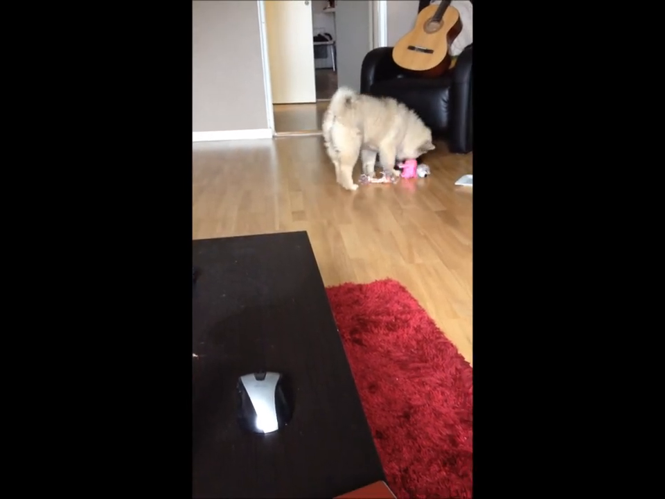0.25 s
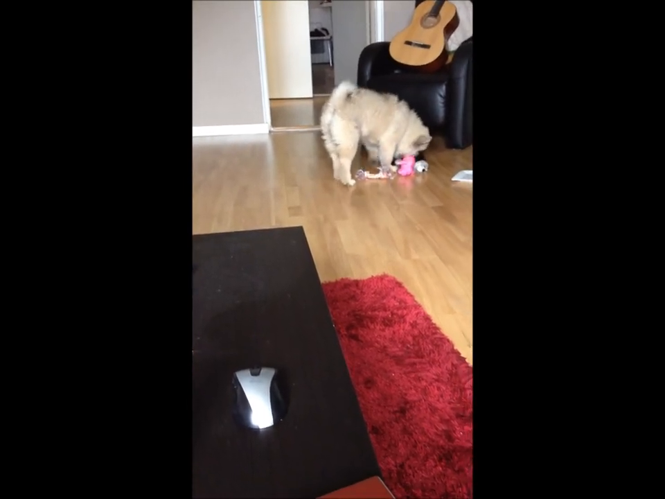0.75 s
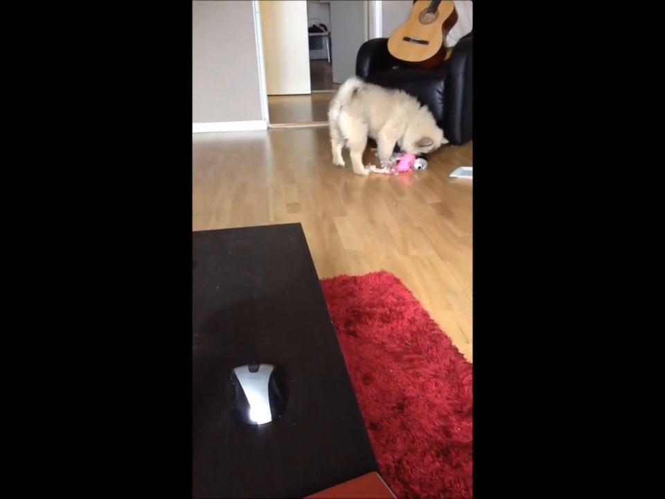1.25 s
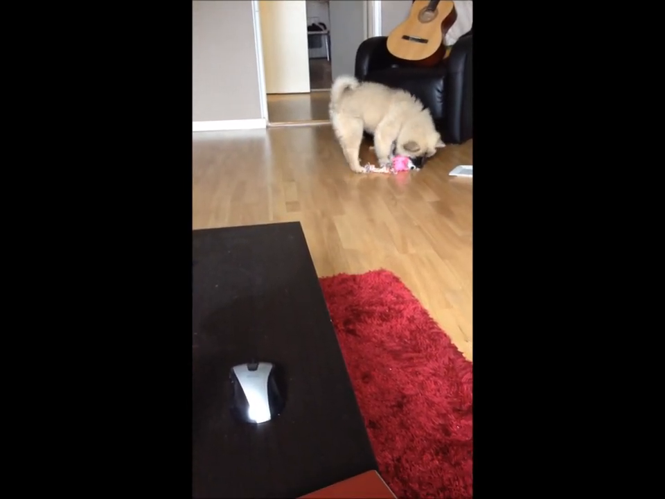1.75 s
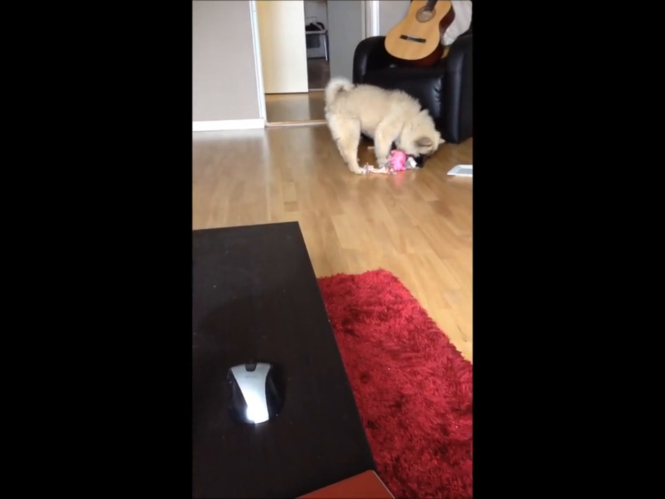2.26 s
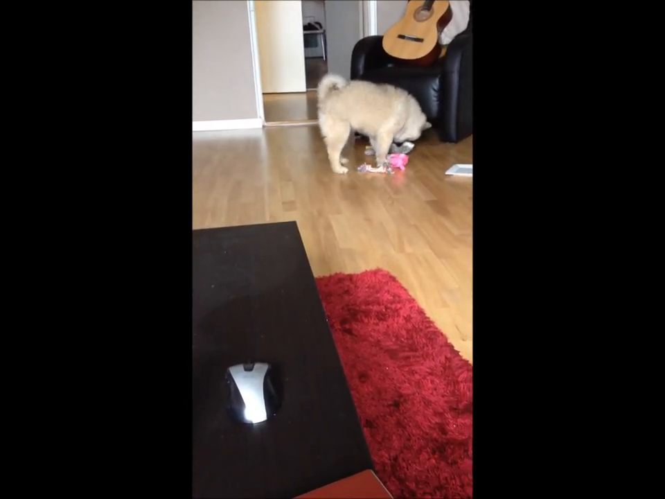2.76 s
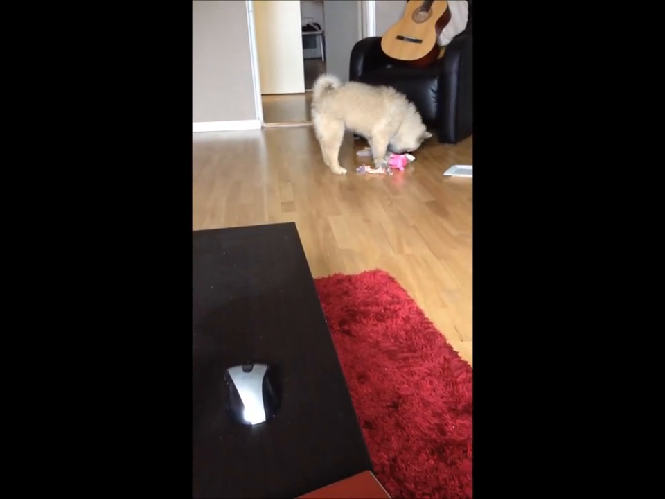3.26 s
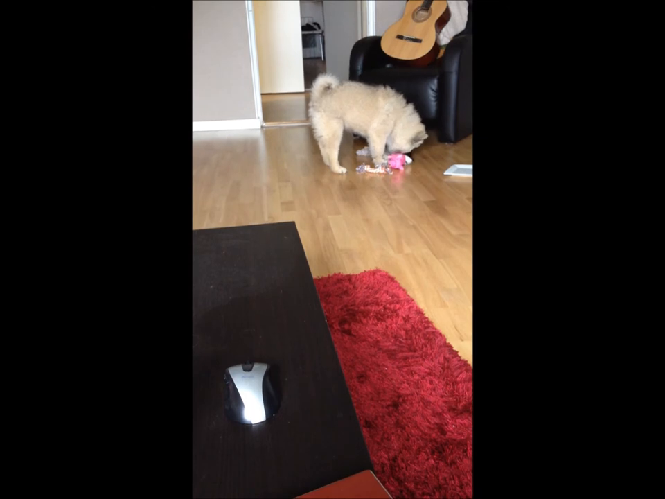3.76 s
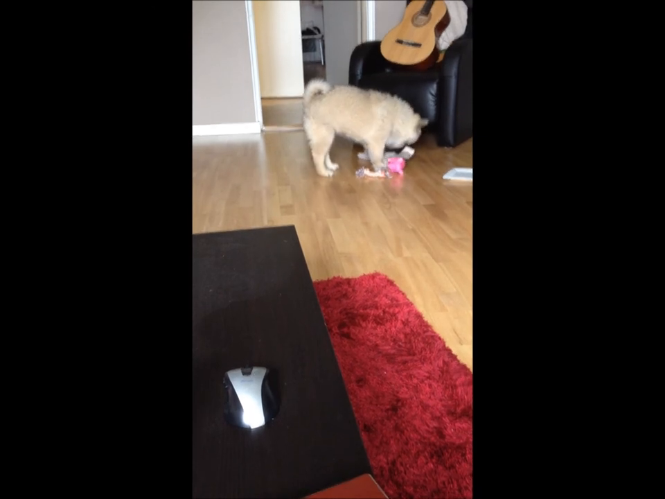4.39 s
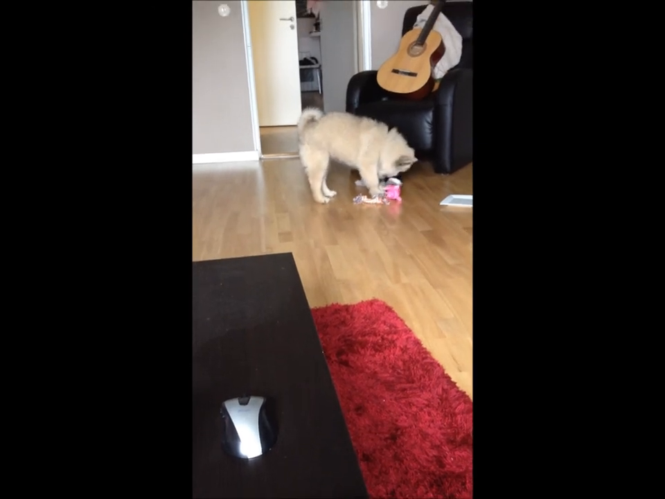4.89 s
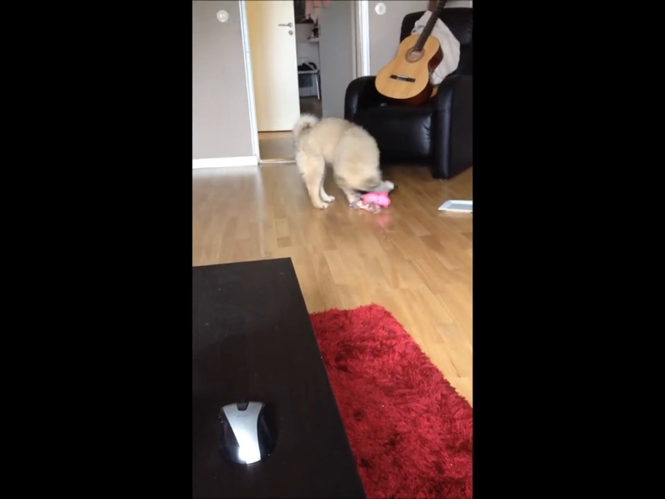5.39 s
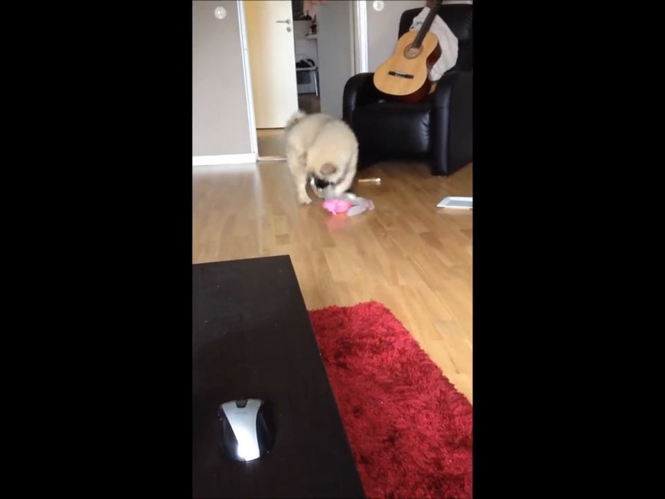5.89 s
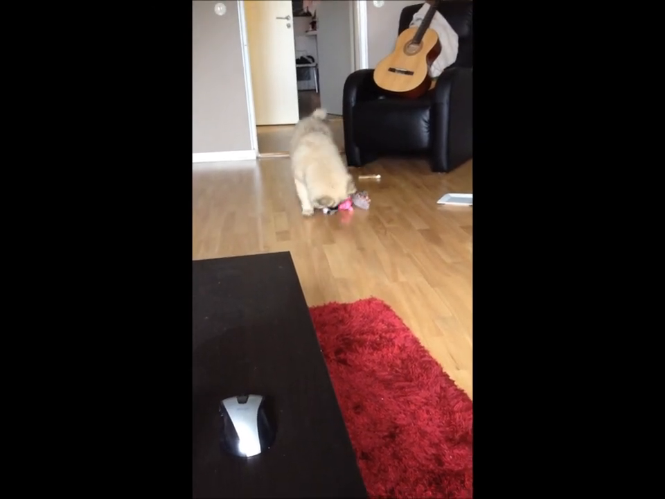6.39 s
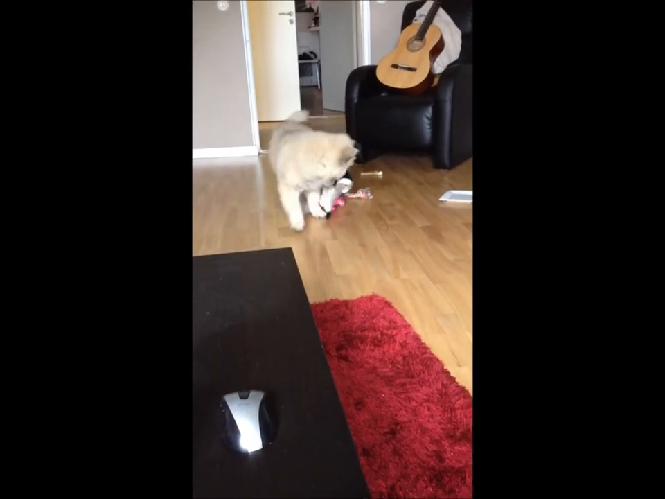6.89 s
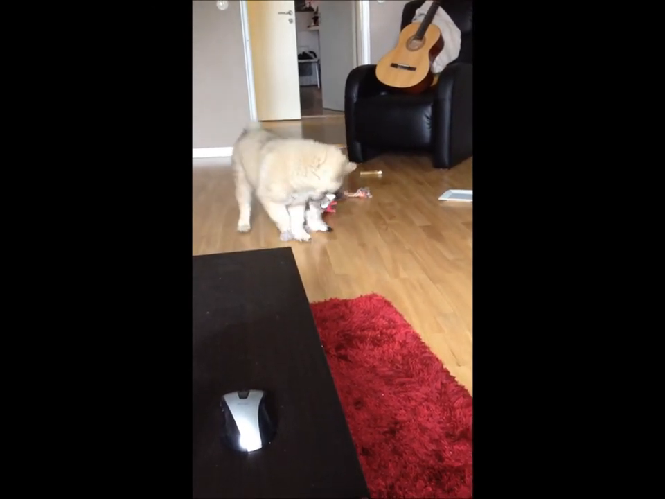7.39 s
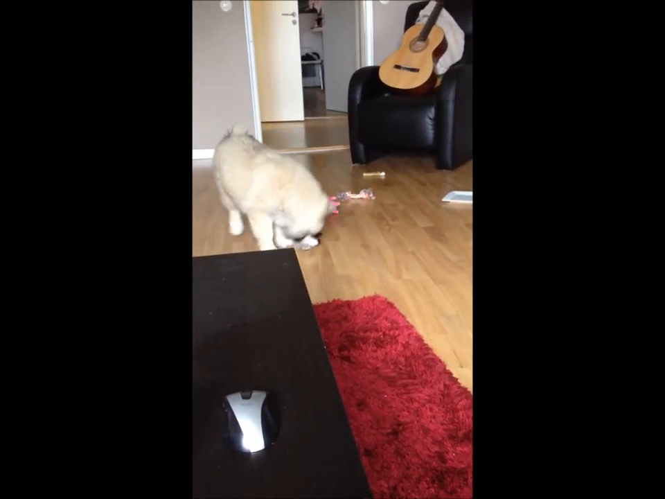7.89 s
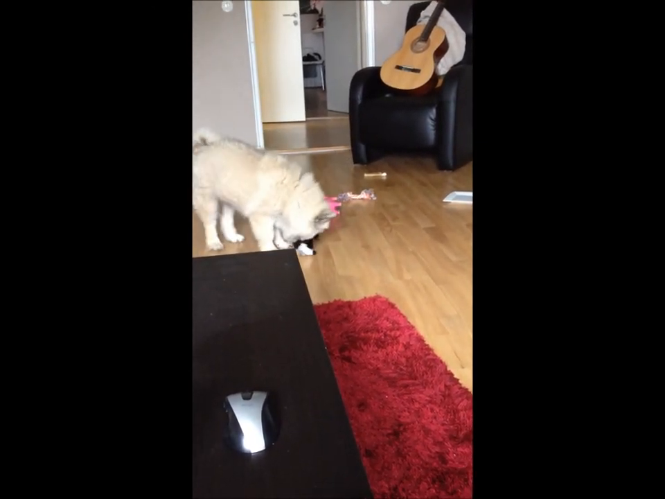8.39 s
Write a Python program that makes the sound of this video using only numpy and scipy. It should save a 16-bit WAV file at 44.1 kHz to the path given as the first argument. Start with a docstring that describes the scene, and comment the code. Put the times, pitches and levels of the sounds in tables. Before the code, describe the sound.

A small dog chews a squeaky toy indoors, short raspy squeaks in uneven bursts, with soft floor bumps and a sharp click in a ringing room.

```python
"""A small dog chews a plush squeaky toy on the wooden floor of a bare, ringing living room.
Over a faint hush, paws shuffle and plush rustles (shaped noise), then soft bumps thud in the boards.
From about two seconds the toy squeaks: each bite forces air out through a reed, a harmonic tone that
bends and rasps, and the bulb refills on a steadier, gentler note.
Later come more bumps, two brief drags and two claw or tooth clicks (decaying modes); squeaks end it."""
import sys
import numpy as np
from scipy import signal
from scipy.fft import rfft, irfft, next_fast_len
from scipy.io import wavfile
from scipy.ndimage import map_coordinates

SR = 44100
rng = np.random.default_rng(int(sys.argv[2]) if len(sys.argv) > 2 else 0)


def store_pcm(level_fs):
    """Save levels as 16-bit WAV."""
    pcm = np.round(np.clip(level_fs, -1, 1) * 32767).astype(np.int16)
    wavfile.write(sys.argv[1], SR, np.atleast_2d(pcm).T)


N = 381465

# Levels in the event tables are relative: each layer adds its own offset or room sound.
# Bites, air going out: the jaws squeeze, then clamp down and the reed moves to another, mostly higher note.
# Each row: start in seconds, length in s, clamp after s, clamping time in s, start pitch in Hz,
# squeeze pitch in Hz, clamp pitch in Hz, squeeze level in dB, clamp level in dB, clamped rasp from 0 to 1.
BITES = [ (2.651, 0.049, 0.011, 0.010, 1093, 1152, 1196, -38, -37.5, 0.3),
         (3.136, 0.04, 0.014, 0.002, 1429, 1531, 1813, -26, -27.5, 0.95),
         (3.427, 0.032, 0.0044, 0.0055, 1188, 1220, 1250, -39, -40.5, 0.7),
         (3.591, 0.07, 0.038, 0.0013, 1145, 1510, 1864, -30.5, -26.5, 0.91),
         (3.916, 0.081, 0.031, 0.0018, 1275, 1830, 1989, -23.5, -23, 0.65),
         (4.281, 0.071, 0.042, 0.0054, 1338, 1760, 2036, -27, -22, 0.74),
         (4.723, 0.037, 0.0063, 0.010, 1090, 1147, 1103, -41, -46, 0.53),
         (5.147, 0.043, 0.014, 0.0083, 1345, 1356, 1319, -32, -36.5, 0.57),
         (5.773, 0.070, 0.022, 0.0106, 1412, 1401, 1571, -38, -34, 1),
         (7.554, 0.036, 0.0062, 0.004, 1349, 1520, 1546, -31.5, -31.5, 0.53),
         (7.896, 0.13, 0.045, 0.024, 1255, 1198, 1498, -36.5, -31.5, 0.34),
         (8.255, 0.13, 0.073, 0.027, 1308, 1247, 1639, -33.5, -29.5, 0.16)]
# Refills, air drawn back in: the flow swells to a crest and ebbs.
# Each row: start in seconds, length in s, crest as a share of the length, pitch at weak flow in Hz,
# pitch at the crest in Hz, level in dB, rasp at the crest from 0 to 1.
REFILLS = [ (1.883, 0.040, 0.025, 1118, 1190, -43.5, 0.62), (2.79, 0.11, 0.44, 1166, 1196, -37.5, 0.12),
           (3.248, 0.046, 0.082, 993, 1043, -49, 0.1), (3.317, 0.108, 0.30, 1148, 1190, -35, 0.16),
           (3.747, 0.096, 0.524, 1112, 1172, -39.5, 0.37), (4.081, 0.15, 0.187, 1135, 1183, -37, 0.25),
           (4.406, 0.12, 0.70, 1144, 1167, -36, 0.38), (4.8, 0.072, 0.333, 1109, 1179, -38.5, 0.2),
           (5.425, 0.026, 0.02, 1070, 1175, -44, 0.83), (6.565, 0.025, 0.016, 970, 1183, -45.5, 0.7),
           (7.053, 0.016, 0.02, 1000, 1060, -49.5, 0.2), (7.624, 0.12, 0.46, 1069, 1175, -39.5, 0.3),
           (8.049, 0.1, 0.53, 1122, 1257, -35, 0.1), (8.447, 0.13, 0.54, 1113, 1264, -36.5, 0.13)]
# The toy's resonant colour for air going out and coming in. Each row: frequency in Hz, relative gain in dB.
OUT_COLOUR = [(1000, 8), (1500, 1), (1900, 4.5), (2400, 0), (3000, -3), (4500, -3), (5600, -3), (7200, 4),
              (8400, -3), (9500, -16.5), (10800, -30.5), (14000, -33)]
IN_COLOUR = [(1000, 1.5), (1200, 6), (2350, -1.5), (3500, -6.5), (4700, -8.5), (5800, -18), (7000, 2),
             (8200, 2.5), (9400, -9.5), (10600, -36), (12000, -26.5), (14200, -21.5), (15200, -51)]
# Air hissing through the reed, out and in. Each row: frequency in Hz, relative density in dB per Hz.
OUT_HISS = [(70, -51), (170, -14.5), (400, -6.5), (1000, -3), (1800, -3.5), (2500, -4), (4000, -0.5),
            (7300, 3.5), (9000, -13.5), (10800, -27), (14500, -27)]
IN_HISS = [(100, -35.5), (500, -3), (1100, -31), (1700, -4.5), (2300, -4), (5200, -7), (6800, -7),
           (7900, 17.5), (9000, -34), (10200, -30), (14500, -22.5)]
# Paws and toy bumping the floor.
# Each row: start in seconds, level in dB, upper band edge in Hz, time to decay by 30 dB in s.
BUMPS = [(0.866, -59, 330, 0.051), (1.047, -57.5, 367, 0.039), (1.112, -59, 380, 0.024),
         (4.628, -49, 1090, 0.057), (5.199, -36, 1080, 0.08), (5.713, -45.5, 517, 0.13),
         (5.754, -57, 520, .06), (5.811, -41.5, 1090, 0.14), (5.896, -44.5, 710, 0.13),
         (6.05, -51.5, 582, 0.22), (6.261, -40.5, 437, 0.082), (6.291, -47.5, 694, 0.036),
         (6.335, -53, 497, 0.088), (6.56, -46, 915, 0.34), (7.067, -43.5, 444, 0.055),
         (7.132, -49, 610, 0.091)]
# The floor's response to a bump. Each row: frequency in Hz, relative density in dB per Hz.
FLOOR_SPECTRUM = [(50, -36), (100, -13), (150, -9), (230, 11), (330, 3), (450, 2.5), (700, 5.5), (1500, 5),
                  (4000, 16.5), (15000, 29.5)]
# Claws and teeth clicking. Each row: start in seconds, level in dB.
CLICKS = [(6.449, -38.5), (6.8591, -22.5)]
# The modes of a hard tap on the plastic toy. Each row: frequency in Hz, relative level in dB, 60 dB decay in s.
TAP_MODES = [(850, 0.5, 0.0084), (1530, 3, 0.0047), (2050, 20, 0.0027), (5630, -16, 0.0017)]
# Plush and fur brushing, the toy dragging, paws shuffling. Each row: start in seconds, length in s, level in dB.
RUSTLES = [(0, 0.011, -60), (.727, 0.026, -58.5), (.855, 0.033, -62), (1.01, 0.065, -68.5),
           (1.43, 0.045, -69), (2.415, 0.087, -59.5), (2.59, 0.042, -75), (5.57, 0.075, -61),
           (6.16, 0.063, -59.5), (6.445, 0.034, -54.5), (6.765, 0.03, -56.5), (6.864, 0.04, -48),
           (7.115, 0.045, -46.5), (7.155, 0.071, -47), (7.41, 0.08, -65.5)]
DRAGS = [(4.625, 0.05, -45), (5.885, 0.052, -43)]
SHUFFLES = [(0, 0.3, -71), (.2, 0.36, -68)]
# Spectra of these frictions and of the room's hush. Each row: frequency in Hz, relative density in dB per Hz.
PLUSH_SPECTRUM = [(70, -39), (300, 2.5), (1300, -11.5), (2100, 4), (3000, 1.5), (4500, 2), (7500, 0.5),
                  (10500, -11.5), (15000, -10)]
DRAG_SPECTRUM = [(70, -30), (300, -20), (900, -23), (1450, -10.5), (1850, 7), (2300, -16), (5000, -22),
                 (9000, -23), (15000, -46)]
SHUFFLE_SPECTRUM = [(59, -46), (100, -40), (194, 4.5), (293, -4.5), (491, -1), (1120, -11.5), (1850, -8),
                    (9260, -23), (14000, -85)]
HUSH_SPECTRUM = [(15, -47), (25, -30), (75, -31.5), (125, -8), (163, -10), (202, 0.5), (318, -12),
                 (394, -7.5), (450, -13.5), (529, -10.5), (604, -16.5), (709, -16), (2240, -22),
                 (8320, -27), (15000, -31)]
# The room's reverberation. Each row: frequency in Hz, 60 dB decay time in s.
ROOM_DECAY = [(250, 0.46), (1200, 0.46), (3000, 0.5), (7000, 0.42), (14000, 0.31)]

HUSH_DB = -70
TOP_HZ = 15400  # upper band limit
SQUEEZE_RASP = 0.19  # 0 to 1, before the jaws clamp
SQUEEZE_S, SQUEEZE_DB = 0.0093, 9  # width in s of the Gaussian onset, and the level it gains in dB
# As the bulb empties: slack reed's pitch in Hz, share of the way the note moves to it, fade in dB
SLACK_HZ, EMPTY_SAG, EMPTY_DB = 994.5, 0.62, 6.5
JAW_RATE, JAW_BEND, JAW_DB = 111.3, 0.01214, 1  # unsteady grip: knots per second, share of pitch, dB
UNFOLD_RATE, UNFOLD_BEND, UNFOLD_DB = 55.6, 0.00906, 2  # uneven unfolding: the same three units
EBB_RASP = 0.23  # rasp added at weak flow


def squeaker():
    """A driven reed sounds in both directions of flow: forced hard by bites, gently by refills."""
    track = np.zeros(N)
    for start, *row in BITES:
        pitch, db, rasp = bite(*row)
        squeak = reed(pitch, db, rasp, OUT_COLOUR, OUT_HISS,
                      bright=0.0061, hiss_db=-4.5, jitter=0.035, waver=0.0366)
        add(track, start, amp(0.7) * in_room(squeak, wet_db=2.0))
    for start, *row in REFILLS:
        pitch, db, rasp = refill(*row)
        squeak = reed(pitch, db, rasp, IN_COLOUR, IN_HISS,
                      bright=0.11, hiss_db=-1.5, jitter=0.016, waver=0.023)
        add(track, start, amp(0.98) * in_room(squeak, wet_db=0.5))
    return track


def bite(length, clamp_s, clamping_s, start_hz, squeeze_hz, clamp_hz, squeeze_db, clamp_db, rasp):
    """Pressure governs pitch, level and rasp: they settle, shift as the jaws clamp, and pitch and level sag at last."""
    t = np.arange(0, length, 1 / SR)
    slack = np.exp(-(t / SQUEEZE_S) ** 2)
    clamp = 0.5 + 0.5 * np.tanh(2 * (t - clamp_s) / clamping_s)
    spent = np.clip((t - clamp_s) / max(length - clamp_s, 1 / SR), 0, 1) ** 2

    squeezed_hz = squeeze_hz + (start_hz - squeeze_hz) * slack
    squeezed_db = squeeze_db - SQUEEZE_DB * slack
    clamped_hz = clamp_hz + (SLACK_HZ - clamp_hz) * EMPTY_SAG * spent
    clamped_db = clamp_db - EMPTY_DB * spent

    pitch = squeezed_hz + (clamped_hz - squeezed_hz) * clamp
    db = squeezed_db + (clamped_db - squeezed_db) * clamp
    rough = SQUEEZE_RASP + (rasp - SQUEEZE_RASP) * clamp
    grip = wobble(JAW_RATE, len(t))
    return pitch * (1 + JAW_BEND * grip), db + JAW_DB * grip, rough


def refill(length, crest, weak_hz, crest_hz, db, rasp):
    """Air flows back in: one arch of flow steers pitch and rasp; uneven unfolding stirs pitch and level."""
    share = np.linspace(0, 1, int(length * SR))
    ebb = np.interp(share, [0, np.clip(crest, 0, 1), 1], [1, 0, 1]) ** 2
    unfold = wobble(UNFOLD_RATE, len(share))
    pitch = (crest_hz + (weak_hz - crest_hz) * ebb) * (1 + UNFOLD_BEND * unfold)
    return pitch, db + UNFOLD_DB * unfold, rasp + EBB_RASP * ebb


def reed(pitch, db, rasp, colour, hiss, bright, hiss_db, jitter, waver, edge=0.0016):
    """Periodic valving of air gives a harmonic series; rasp makes its cycles uneven and hissy."""
    size = len(pitch)
    t = np.arange(size) / SR
    rasp = np.clip(rasp, 0, 1)
    # a slower unsteadiness bends the note; the faster jitter scatters single cycles
    bend = rasp * (waver * wobble(180, size) + jitter * wobble(800, size))
    flutter_db = 2 * rasp * wobble(600, size)
    phase = 2 * np.pi * np.cumsum(pitch * (1 + bend)) / SR

    harmonic = np.arange(1, 14)[:, None]
    partial_hz = harmonic * pitch
    # harder blowing closes the reed more sharply; each overtone also drifts in strength
    sharp_db = bright * (db + 38) * np.log2(harmonic)
    drift_db = 2.2 * np.array([wobble(70, size) for _ in harmonic]) * (harmonic > 1)
    gains = amp(along(colour, partial_hz) + sharp_db + drift_db) * (partial_hz < TOP_HZ)
    partials = gains * np.sin(harmonic * phase)
    tone = unit(partials.sum(0) * amp(flutter_db))

    # air escapes in one puff each cycle
    puffs = noise(hiss, size, gate=2 + np.cos(phase))
    air = amp(hiss_db) * rasp ** 1.4 * puffs
    fade = np.clip(np.minimum(t, t[-1] - t) / edge, 0, 1)
    return (tone + air) * amp(db) * fade


def bumps():
    """Impact on a damped plate: a decaying burst of noise, with its own band and decay for each bump."""
    track = np.zeros(N)
    t = np.arange(SR // 5) / SR
    for start, db, bright_hz, length in BUMPS:
        band = signal.butter(2, [bright_hz / 4, bright_hz], "bandpass", fs=SR, output="sos")
        blow = amp(-30 * t / length) * (1 - np.exp(-t / 0.0015))
        thud = signal.sosfilt(band, noise(FLOOR_SPECTRUM, len(t), gate=blow))
        thud = unit(thud) * np.std(blow)
        add(track, start, amp(db + 2.5) * in_room(thud, wet_db=-2.0))
    return track


def clicks():
    """Modal superposition: a hard contact excites a few rapidly damped sine modes."""
    track = np.zeros(N)
    t = np.arange(SR // 5) / SR
    modes = sum(amp(db - 60 * t / t60) * np.sin(2 * np.pi * hz * t) for hz, db, t60 in TAP_MODES)
    click = modes * (1 - np.exp(-t / 0.0017))
    for start, db in CLICKS:
        add(track, start, amp(db) * in_room(click, wet_db=5.0))
    return track


def rubbing(strokes, spectrum, grain_db, grain_rate, wet_db):
    """Sliding friction: coloured noise swells and fades with each stroke, catching unevenly."""
    track = np.zeros(N)
    for start, length, db in strokes:
        size = int(length * SR)
        swell = np.hanning(size) ** 0.14
        grains = unit(noise(spectrum, size) * amp(grain_db * wobble(grain_rate, size)))
        add(track, start, in_room(amp(db + 1) * swell * grains, wet_db))
    return track


def room_hush():
    """Stationary random sound: coloured noise at a constant level."""
    return amp(HUSH_DB) * noise(HUSH_SPECTRUM, N)


def in_room(x, wet_db, gap=0.0022):
    """Diffuse reverberation: direct sound plus a tail of decaying noise, drawn anew for each sound."""
    hz, t, bands = signal.stft(rng.standard_normal(SR * 3 // 5), SR, nperseg=256)
    decay = amp(-60 * t / along(ROOM_DECAY, hz)[:, None])
    tail = signal.istft(bands * decay, SR, nperseg=256)[1]
    # silent for one gap (s), then fading in over another
    tail *= np.clip(np.arange(len(tail)) / SR / gap - 1, 0, 1)
    m = next_fast_len(len(x) + len(tail), True)
    direct = rfft(x, m)
    heard = direct * (1 + amp(wet_db) * rfft(tail / np.linalg.norm(tail), m))

    def band_power(spectrum):
        """Energy density smoothed over neighbouring frequencies."""
        return signal.fftconvolve(np.abs(spectrum) ** 2, np.hanning(m // 50), "same")

    # the room spreads each band's energy in time and keeps its total
    balance = (np.abs(band_power(direct)) + 1e-12) / (np.abs(band_power(heard)) + 1e-12)
    return irfft(heard * np.sqrt(balance), m)


def noise(spectrum, size, gate=1):
    """Filtered random excitation: white noise gated, then coloured, at rms 1."""
    m = next_fast_len(size + 2048)
    gain = amp(along(spectrum, np.fft.rfftfreq(m, 1 / SR)))
    source = gate * rng.standard_normal(size)
    return unit(irfft(rfft(source, m) * gain, m)[:size])


def wobble(rate, size):
    """Band-limited fluctuation: a smooth curve through random knots, rate of them a second."""
    knots = rng.standard_normal(int(size * rate / SR) + 4)
    return map_coordinates(knots, [np.arange(size) * rate / SR])


def along(points, hz):
    """Logarithmic frequency scale: (Hz, value) points interpolated along it."""
    f, v = np.transpose(points)
    return np.interp(np.log(hz + 1), np.log(f + 1), v)


def amp(db):
    """Level to amplitude: 20 dB is a factor of ten."""
    return 10 ** (np.asarray(db) / 20)


def unit(x):
    """Normalisation of x to rms 1."""
    return x / np.sqrt(np.mean(x ** 2) + 1e-20)


def add(track, start, sound):
    """Linear superposition of a sound from the given second, cut at the track's end."""
    part = track[max(0, round(start * SR)):][:len(sound)]
    part += sound[:len(part)]


def scene():
    """Superposition of the toy, the dog's movements and the hush of the room."""
    plush = rubbing(RUSTLES, PLUSH_SPECTRUM, grain_db=2.5, grain_rate=250, wet_db=1.5)
    drags = rubbing(DRAGS, DRAG_SPECTRUM, grain_db=17, grain_rate=194.4, wet_db=4.0)
    paws = rubbing(SHUFFLES, SHUFFLE_SPECTRUM, grain_db=2.5, grain_rate=60, wet_db=-7.5)
    return (squeaker() + bumps() + clicks() + plush + drags + paws + room_hush())[None]


def record(dry):
    """Ideal low-pass filtering: nothing passes above the band limit."""
    m = next_fast_len(N + SR // 2)
    passed = np.fft.rfftfreq(m, 1 / SR) < TOP_HZ
    return irfft(rfft(dry, m) * passed, m)[..., :N]


dry = scene()
out = record(dry)
store_pcm(out)
```